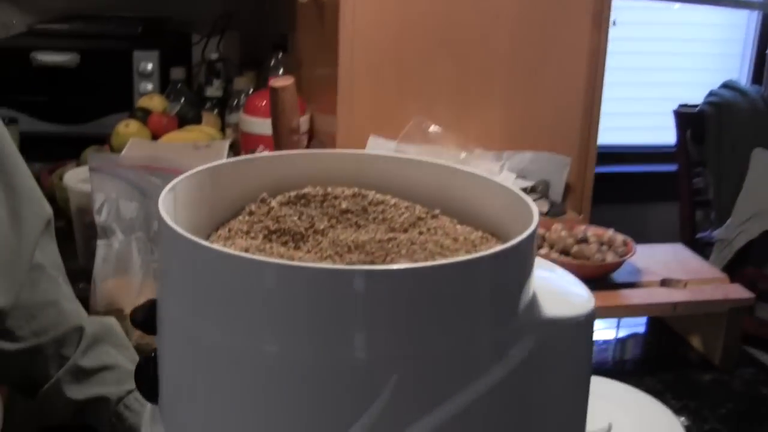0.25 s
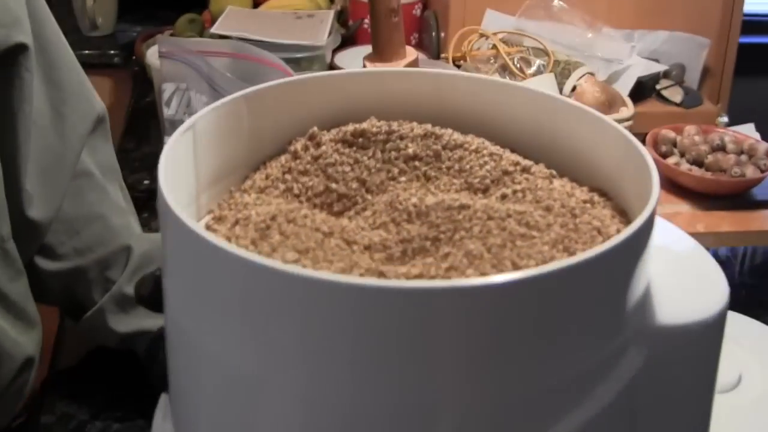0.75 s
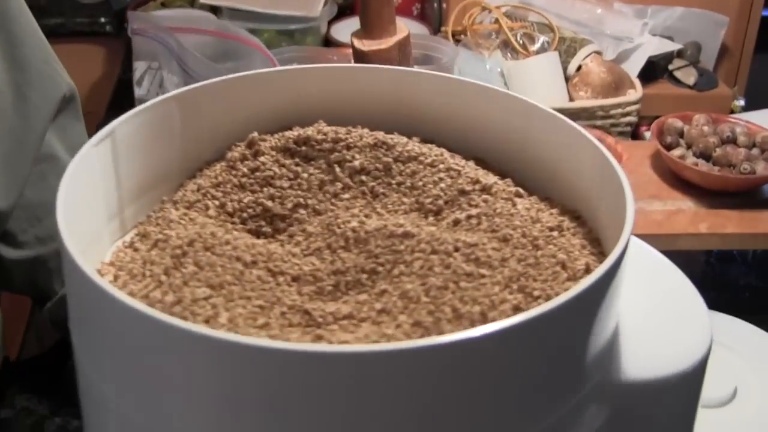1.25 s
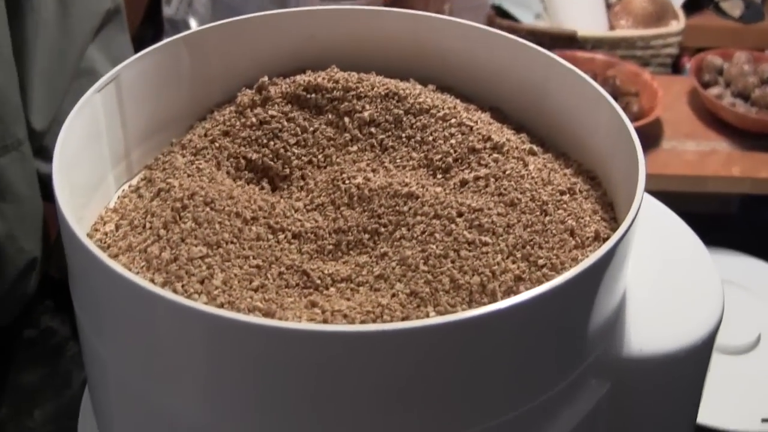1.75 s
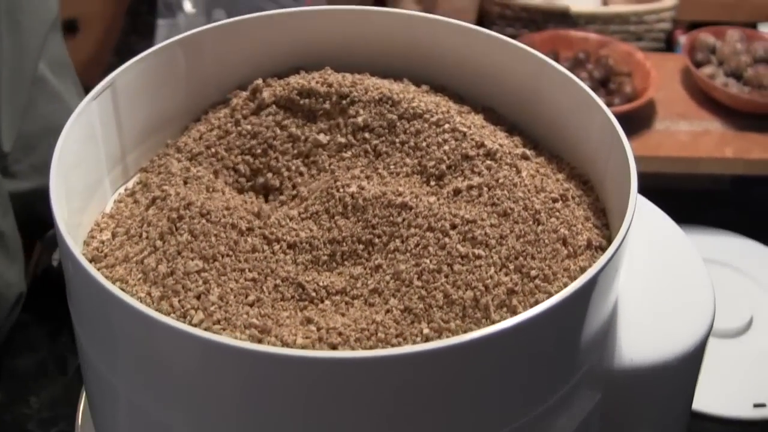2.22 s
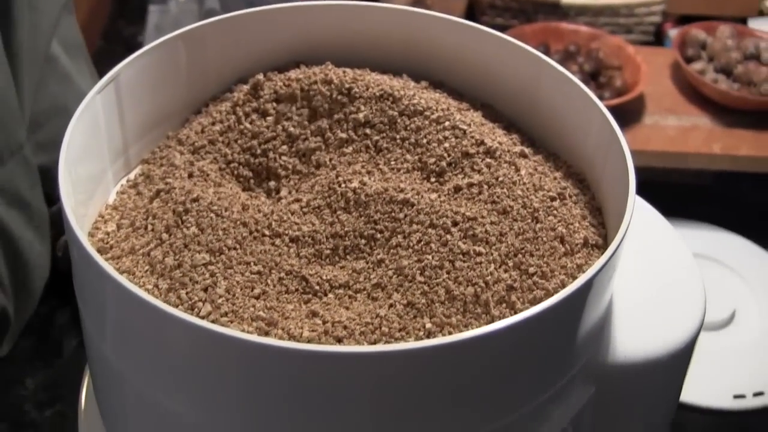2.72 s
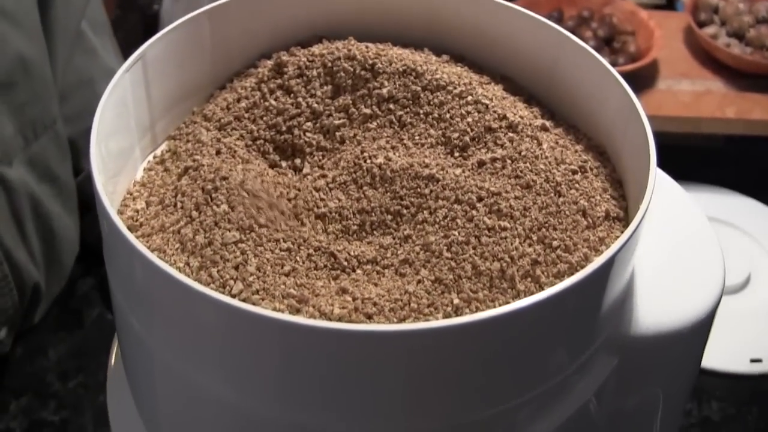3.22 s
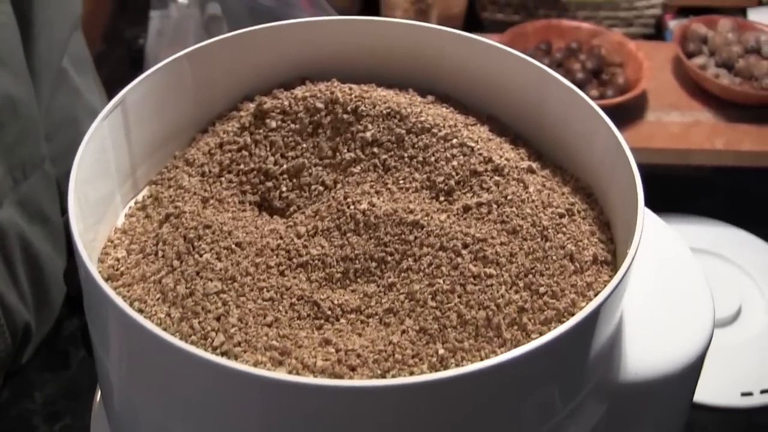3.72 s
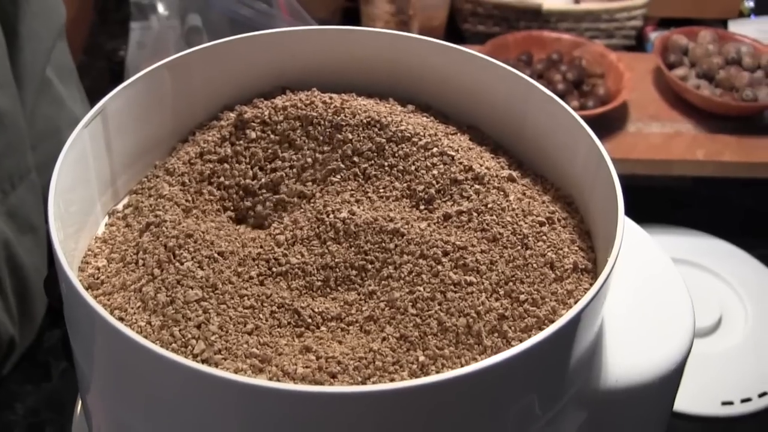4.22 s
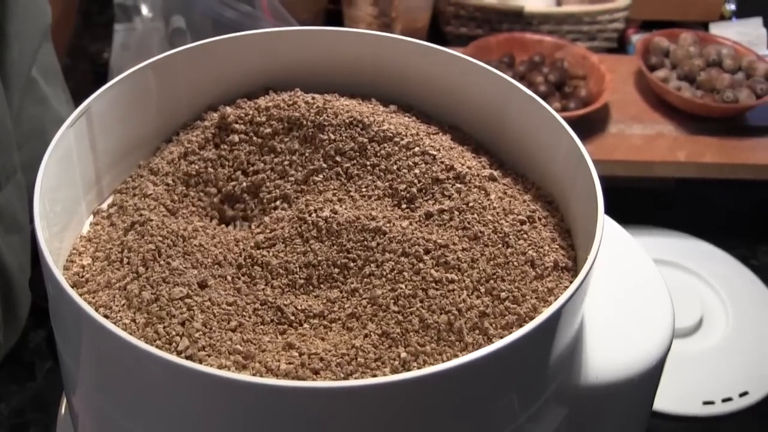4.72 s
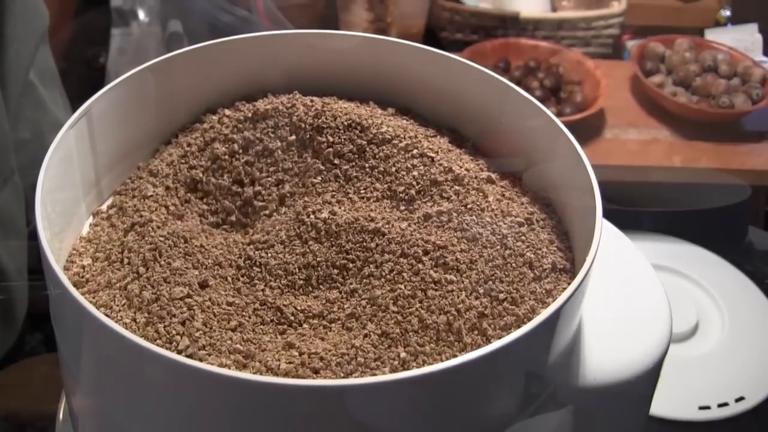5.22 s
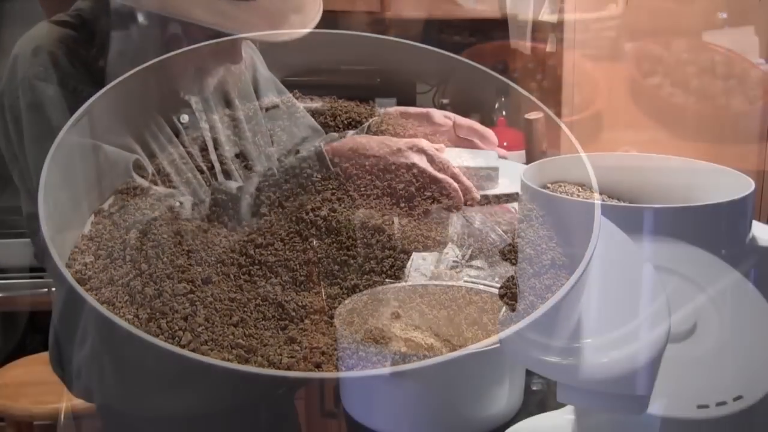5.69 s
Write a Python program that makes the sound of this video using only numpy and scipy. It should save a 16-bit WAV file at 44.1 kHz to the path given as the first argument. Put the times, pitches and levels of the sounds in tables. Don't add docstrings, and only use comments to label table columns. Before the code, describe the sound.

Close, steady roar of a kitchen mill shattering kernels, with buzzing hum and piercing whistle, slowly dimming until it is nearly gone.

```python
import sys
import numpy as np
from scipy import signal
from scipy.fft import rfft, irfft, next_fast_len
from scipy.io import wavfile

SR = 44100
rng = np.random.default_rng(int(sys.argv[2]) if len(sys.argv) > 2 else 0)


def magnitude_from_level(level_db):
    exponent = np.asarray(level_db, float) / 20
    return 10 ** exponent


def wrap_up_sound(samples):
    columns = np.atleast_2d(samples).T
    tamed = np.clip(columns, -1, 1)
    steps = np.round(tamed * 32767).astype(np.int16)
    wavfile.write(sys.argv[1], SR, steps)


N = 262379
COARSE = np.arange(0, N + 40, 40)
COARSE_S = COARSE / SR
MIDDLE_S, USUAL_TURNS_PER_S = 3, 348

# (frequency [Hz], level [dB])
SIDE_SPECTRUM = [(60, -10), (110, -15), (200, -16), (380, -17), (700, -16), (1290, -20), (2380, -23),
                 (4400, -16), (8120, -13), (15000, -18)]
# (frequency [Hz], level [dB])
LEAN_SPECTRUM = [(60, -3), (110, -2), (200, -2), (380, -1), (700, -1), (1290, 0.5), (2380, 1.5),
                 (4400, 1.5), (8120, 0), (15000, 3.5)]


def at_hz(points, hz):
    points_hz, points_db = np.transpose(points)
    return np.interp(np.log(hz + 1), np.log(points_hz), points_db)


def in_time(rows):
    time_s, value = np.transpose(rows)
    return np.interp(COARSE_S, time_s, value)


def fine(slow):
    return np.interp(np.arange(N), COARSE, slow)


def drift(rate_hz):
    pole = np.exp(-80 * np.pi * rate_hz / SR)
    noise = rng.standard_normal(len(COARSE) + 2000)
    slow = signal.lfilter([1], [1, -2 * pole, pole * pole], noise)[2000:]
    return slow / slow.std()


def tone(phase, hz, level_db, slow_db, fast_db, wobble_rad):
    wander_db = slow_db * drift(0.88) + fast_db * drift(14.4)
    swell = fine(np.sqrt(2) * magnitude_from_level(level_db + wander_db))
    phase = phase + fine(wobble_rad * drift(14.8) + rng.uniform(0, 2 * np.pi))
    side_share = fine(magnitude_from_level(at_hz(SIDE_SPECTRUM, hz)) * (1 + 0.22 * drift(0.57)))
    lean = magnitude_from_level(at_hz(LEAN_SPECTRUM, hz) / 2)
    mid = swell * np.sin(phase)
    side = swell * side_share * np.cos(phase)
    return np.array([lean * (mid + side), (mid - side) / lean])


def faint_hum():
    mains_hz, enters_s, floor_db, end_db = 60, 5.4, -85, -63
    entering = np.clip((COARSE_S - enters_s) / (COARSE_S[-1] - enters_s), 0, 1)
    level_db = 20 * np.log10(magnitude_from_level(floor_db) + magnitude_from_level(end_db) * entering ** 2)
    phase = 2 * np.pi * mains_hz * np.arange(N) / SR
    return tone(phase, mains_hz, level_db, slow_db=0, fast_db=.4, wobble_rad=.05)


def reflection(loud_db):
    from_hz, to_hz, glide_s, glide_db = 6300, 5200, .9, -11.5
    done = np.clip(COARSE_S / glide_s, 0, 1)
    hz = from_hz + (to_hz - from_hz) * done + 150 * drift(150)
    phase = 2 * np.pi * np.cumsum(fine(hz)) / SR
    level_db = loud_db + glide_db - 40 * done ** 4
    return tone(phase, to_hz, level_db, slow_db=0, fast_db=1.5, wobble_rad=.8)


def grinding(turn, speed, loud_db, far):
    # (frequency [Hz], level [dB per Hz])
    hiss_spectrum = [(30, -31), (90, -27), (140, -7.5), (300, -3.5), (450, -0.5), (620, 4), (1000, 1),
                     (2100, 0.5), (2900, -1.5), (6000, 1), (9000, 1.5), (12000, -1.5), (14000, -1),
                     (16000, -7)]
    # (frequency [Hz], width [Hz], level [dB])
    housing_modes = [(631, 43, -8), (747, 52, -4), (1466, 180, -3), (1600, 110, 4), (1800, 210, -4),
                     (2432, 346, 10), (2460, 87, -10), (2786, 114, -10.5), (3210, 400, 1), (3640, 220, -5),
                     (4460, 190, 4.5), (4630, 195, -6), (5190, 410, 1), (7340, 310, 1.5), (7500, 250, -3.5),
                     (7860, 580, 3.5)]
    cracks_per_s, widen_db_per_s = 4000, 0.5
    dull_hz, bright_hz = 1020, 3620
    far_colour_loss = 0.62
    floor_below_db, floor_share = -46, 0.44

    crack_size = magnitude_from_level(1.5 * rng.exponential(1, N)) * rng.choice([-1, 1], N)
    cracks = (rng.random(N) < cracks_per_s / SR) * crack_size
    mid = rng.standard_normal(N) * (1 + 0.07 * np.cos(turn)) + 0.35 * cracks
    side = rng.standard_normal(N) * fine(magnitude_from_level(widen_db_per_s * (COARSE_S - MIDDLE_S)))

    size = next_fast_len(N)
    hz = np.arange(size // 2 + 1) * SR / size
    housing_db = 1.33 * sum(db / (1 + (2 * (hz - at) / width) ** 2) for at, width, db in housing_modes)
    side_part = magnitude_from_level(at_hz(SIDE_SPECTRUM, hz) + 1.5) * rfft(side, size) * [[1], [-1]]
    lean = magnitude_from_level(at_hz(LEAN_SPECTRUM, hz) / 2)
    pair = np.array([lean, 1 / lean]) * magnitude_from_level(at_hz(hiss_spectrum, hz)) * (rfft(mid, size) + side_part)

    plain = fine(np.minimum(2 * far, 1))

    def band(share):
        near_sound = irfft(pair * share * magnitude_from_level(housing_db), size)[:, :N]
        far_sound = irfft(pair * share * magnitude_from_level((1 - far_colour_loss) * housing_db), size)[:, :N]
        return (1 - plain) * near_sound + plain * far_sound

    low_share = 1 / (1 + (hz / dull_hz) ** 4)
    high_share = 1 / (1 + (bright_hz / (hz + 1)) ** 4)
    rumble = band(low_share)
    body = band(1 - low_share - high_share)
    high = band(high_share)

    floor_lift_db = -floor_share * np.minimum(loud_db - floor_below_db, 0)
    rumble_db = -11 + 9.0 + floor_lift_db + .5 * drift(5.6)
    free_db = 0.12 * (speed - USUAL_TURNS_PER_S)
    bright_db = -1.5 - 0.57 * (COARSE_S - MIDDLE_S)
    low = body * fine(magnitude_from_level(.5 * drift(3.1))) + rumble * fine(magnitude_from_level(rumble_db))
    low *= fine(magnitude_from_level(loud_db + 0.5 + free_db)) / body.std()
    high *= fine(magnitude_from_level(loud_db + bright_db + 0.5 + 0.5 * drift(7.7))) / high.std()
    return low + high


def strength(rule, order, far, speed):
    # (time [s],
    # shaft order, half length [s], level [dB])
    order_swells = [(0.24, 3, 0.45, 2.0), (0.24, 5, 0.3, -8.4), (0.3, 4, 0.3, -6.2), (0.54, 6, 0.3, -5.5),
                    (0.78, 3, 0.3, -6.2), (0.9, 4, 0.2, 3.2), (0.96, 2, 0.2, -7.9), (1.02, 5, 0.2, 3.2),
                    (1.26, 0, 0.2, 3.4), (1.32, 5, 0.2, -4.3), (1.38, 6, 0.3, 3.8), (1.74, 3, 0.3, 4.2),
                    (1.8, 5, 0.45, 2.3), (1.92, 4, 1.0, -7.7), (2.04, 6, 0.3, -11.4), (2.1, 0, 0.3, -6.1),
                    (2.46, 3, 0.7, -2.8), (2.88, 5, 1.0, -4.8), (3.18, 4, 0.7, 2.0), (3.36, 2, 1.0, -2.7),
                    (3.96, 3, 0.3, -5.2), (4.74, 4, 0.2, -12.3), (4.8, 2, 0.3, 3.7), (5.04, 3, 0.2, 3.6),
                    (.42, 3, .12, 2.5), (2.4, 2, .18, 2.5), (4.25, 2, .13, 3), (4.45, 1, .1, 1.5),
                    (.7, 1, .2, -1.5),
                    (.06, 36, .3, 4.5), (.12, 24, .3, -4.7), (.35, 36, .12, -10), (.3, 30, .08, -7),
                    (.55, 30, .25, -5.5), (.6, 12, .45, -4.2), (.6, 24, .45, 2.6), (.65, 36, .15, -8),
                    (.66, 15, .3, 3.6), (.7, 18, .3, -13), (.1, 18, .2, 4), (1.05, 30, .4, 5.1),
                    (1.14, 12, .25, 4.3), (1.25, 20, .3, 5.5), (1.2, 36, .45, -2.5), (1.56, 24, .4, -5.6),
                    (1.74, 12, .3, -4), (2.1, 24, .3, 3.8), (2.2, 15, .2, 4.5), (2.4, 30, .6, -3.5),
                    (2.76, 24, .3, -3), (3.0, 20, .3, -7), (3.3, 15, .7, -3), (3.54, 24, .7, -3.5),
                    (4.14, 24, .25, 4.5), (4.24, 30, .2, -9), (4.25, 18, .15, -8), (2.2, 18, .5, 2.5),
                    (4.62, 36, .22, -6.5), (4.9, 36, .25, -6.5), (5.55, 30, .25, -9)]
    base_db, far_db, db_per_s, db_per_turn = rule
    level_db = base_db + far_db * far + db_per_s * (COARSE_S - MIDDLE_S)
    level_db = level_db + db_per_turn * (speed - USUAL_TURNS_PER_S)
    for at_s, which, half_s, swell_db in order_swells:
        if which == order:
            place = np.clip((COARSE_S - at_s) / half_s, -1, 1)
            level_db = level_db + swell_db * np.cos(np.pi / 2 * place) ** 2
    return level_db


def strong_orders(turn, speed, loud_db, far):
    strong_order = [1, 2, 3, 4, 5, 6, 12, 15, 17, 18, 20, 24, 30, 36]
    # (level [dB], extra from afar [dB], trend [dB/s], speed slope [dB per turn/s])
    strong_rules = [(5, 7.5, 1.28, 0.18), (-3.5, -6, .5, 0.87), (-3.5, 5.4, -.6, 0.06),
                    (-7, 3, 0.75, -0.73), (-7, -4.5, -0.9, 0.16), (-13.5, 5, 0.2, 1.2),
                    (-9, -1.2, -0.1, 0.16), (-18, 1.5, -2, -0.56), (-21.5, 7.5, -0.8, 0.7),
                    (-14, 0.5, -0.2, -0.4), (-15.5, -9, -2.1, .5), (-9.5, 0.2, -0.9, -0.1),
                    (-2.5, 0.5, -1.5, -.5), (2.5, -12.5, -0.26, 0.03)]
    mean_hz = np.mean(speed)
    out = np.zeros((2, N))
    for order, rule in zip(strong_order, strong_rules):
        if order < 7:
            fast_db, wobble_rad = .3 + .25 * order, .03 * order
        elif order == 17:
            fast_db, wobble_rad = 3, 1.5
        elif order < 30:
            fast_db, wobble_rad = 1.8, .25
        else:
            fast_db, wobble_rad = 1.2, .3
        level_db = loud_db + strength(rule, order, far, speed)
        out += tone(order * turn, order * mean_hz, level_db, 0, fast_db * (1 + 0.52 * far), wobble_rad)
    return out


def weak_orders(turn, speed, loud_db):
    weak_order = [2.6, 3.4, 7, 8, 8.65, 9, 10, 10.5, 11, 13, 16.5, 19, 23, 26, 28, 29, 32, 35, 38, 42]
    weak_db = [-12, -22, -16, -14, -27, -17.5, -18, -20.5, -21, -16, -22, -19, -26, -16, -20, -28, -35, -35,
               -25, -35]
    mean_hz = np.mean(speed)
    out = np.zeros((2, N))
    for order, db in zip(weak_order, weak_db):
        out += tone(order * turn, order * mean_hz, loud_db + db, slow_db=1.8, fast_db=2.0, wobble_rad=.2)
    return out


def mains_pull(turn, speed, loud_db, far):
    # (level [dB], extra from afar [dB], trend [dB/s], slope [dB per turn/s])
    beat_rule = (-9.5, 4, -1.54, -0.7)
    pulled = [(0, 1), (0, 2), (1, -1), (1, 2), (2, -1), (2, 1), (2, 2), (3, -1), (3, 1), (3, 2), (4, -1),
              (4, 1), (4, 2), (5, -1), (5, 1), (6, -1)]
    pulled_rules = [(-24, 2, -0.39, .01), (-16, 1.5, -.7, -0.1), (-20, -2, -0.97, -1.4),
                    (-21.5, -18, -.4, 0.9), (-18, -9, 0.5, 0.7), (-12.5, 4, -0.4, 1.35),
                    (-17, 6.5, .8, -0.6), (-15.5, 8, 1.1, 0.8), (-12.5, -1, -0.67, -0.3),
                    (-13.5, 0, -0.65, 1.5), (-17, .3, .2, 2), (-16, 3.5, -.5, 0.1), (-16.5, 4.5, -.2, 3),
                    (-16, -1, -0.44, 1.5), (-15, -0.5, .1, 1.5), (-14.5, 4, 1.1, -0.2)]
    pull_hz = 120
    pull = 2 * np.pi * pull_hz * np.arange(N) / SR
    mean_hz = np.mean(speed)
    beat_db = loud_db + strength(beat_rule, 0, far, speed)
    out = tone(turn + pull, mean_hz + pull_hz, beat_db, slow_db=0, fast_db=2.0, wobble_rad=0.57)
    limited_speed = np.clip(speed, USUAL_TURNS_PER_S - 2, USUAL_TURNS_PER_S + 3)
    for (order, times), rule in zip(pulled, pulled_rules):
        rough = min(order, 1)
        level_db = loud_db + strength(rule, None, far, limited_speed)
        out += tone(order * turn + times * pull, order * mean_hz + times * pull_hz, level_db,
                    0.04 + 0.29 * rough, 0.16 + 2.4 * rough, 0.14 + 0.31 * rough)
    return out


def motor(turn, speed, loud_db, far):
    out = mains_pull(turn, speed, loud_db, far)
    out += weak_orders(turn, speed, loud_db)
    return out + strong_orders(turn, speed, loud_db, far)


def scene():
    # (time [s], speed [turns/s])
    speed_curve = [(0, 349.9), (.2, 350.1), (.6, 348), (.82, 347.6), (1.1, 351), (1.27, 352.1),
                   (1.6, 350.1), (2.0, 349.6), (2.42, 352), (2.82, 346.1), (3.0, 346.8), (3.7, 346.8),
                   (4.25, 352.3), (4.62, 340.8), (4.75, 340.1), (5.0, 342.8), (5.12, 345.8), (5.95, 351.6)]
    # (time [s], level [dB])
    loudness_curve = [
        (0, -28),
        (.6, -29),
        (1.5, -28.5),
        (2, -29.5),
        (2.8, -32),
        (3.9, -34.5),
        (4.5, -37.5),
        (5.15, -41),
        (5.7, -48.5),
        (5.95, -54.5),
    ]
    arrive_s = 1.8
    loud_db = in_time(loudness_curve)
    far = np.clip(1 - COARSE_S / arrive_s, 0, 1)
    speed = in_time(speed_curve) + 0.1083 * drift(8.48)
    turn = 2 * np.pi * np.cumsum(fine(speed)) / SR
    background = faint_hum() + reflection(loud_db)
    return background + grinding(turn, speed, loud_db, far) + motor(turn, speed, loud_db, far)


def low_pass(x):
    return signal.sosfilt(signal.butter(12, 15750, fs=SR, output="sos"), x)


def record(dry):
    return low_pass(dry)


dry = scene()
out = record(dry)
wrap_up_sound(out)
```